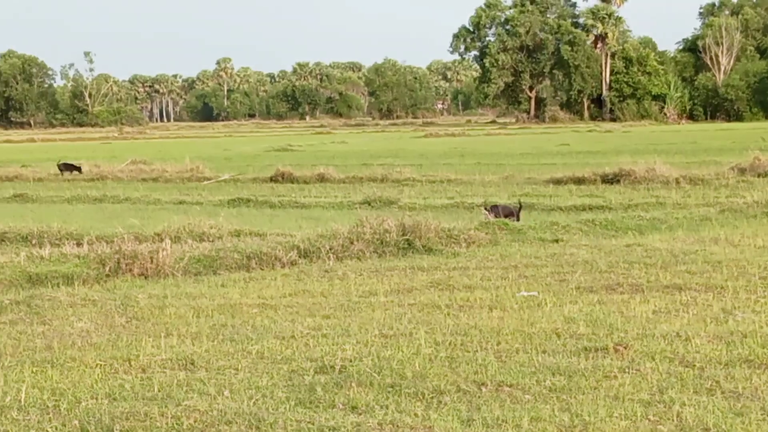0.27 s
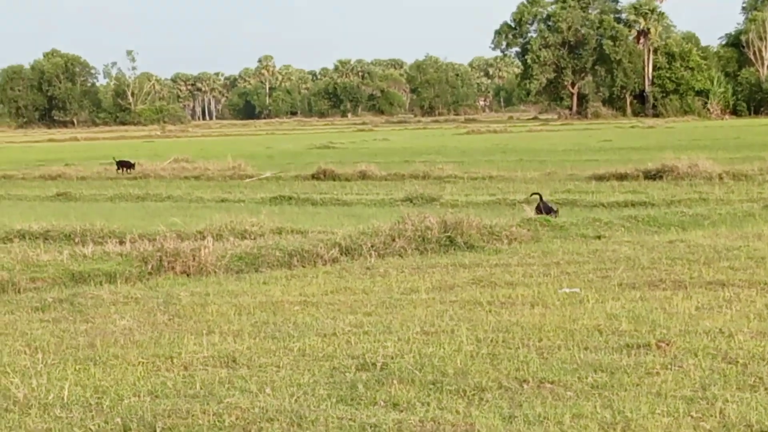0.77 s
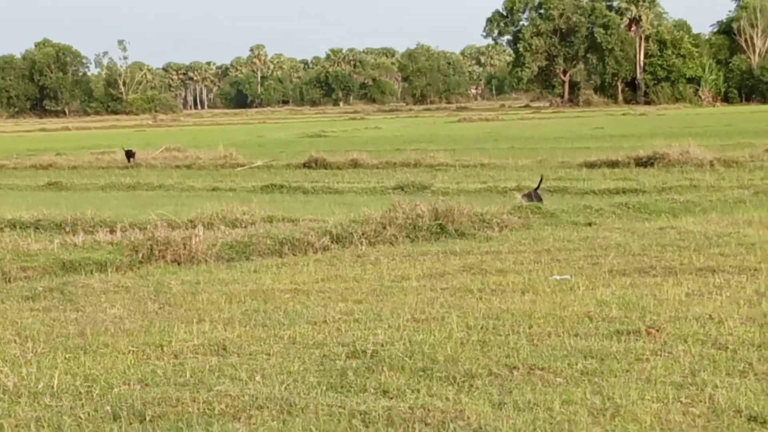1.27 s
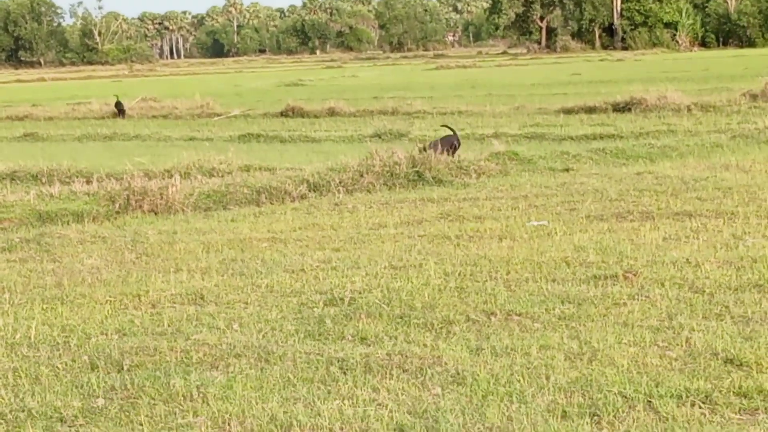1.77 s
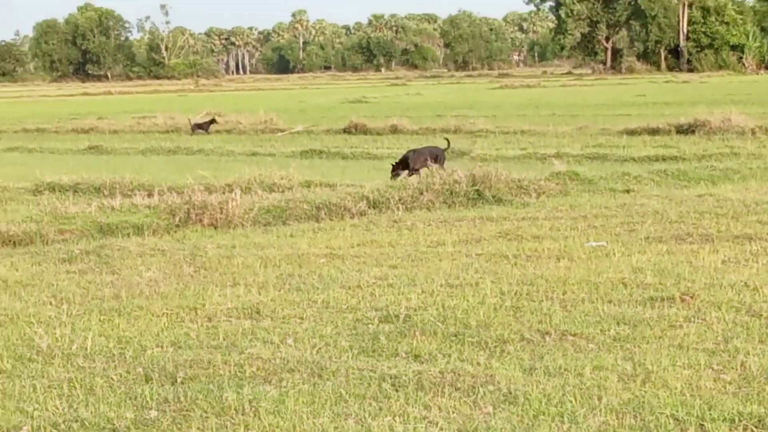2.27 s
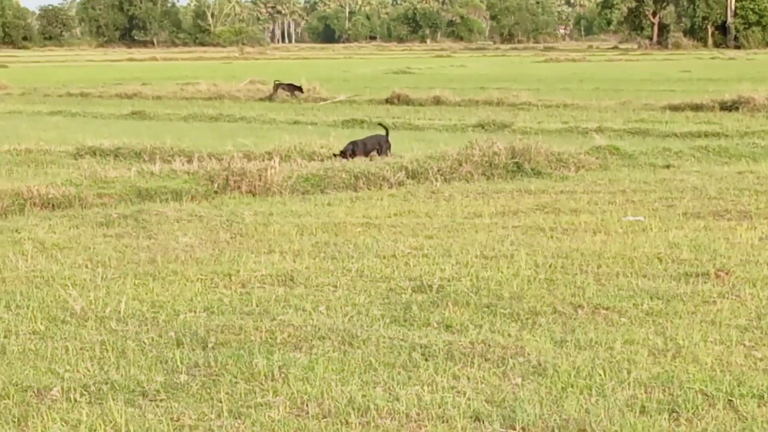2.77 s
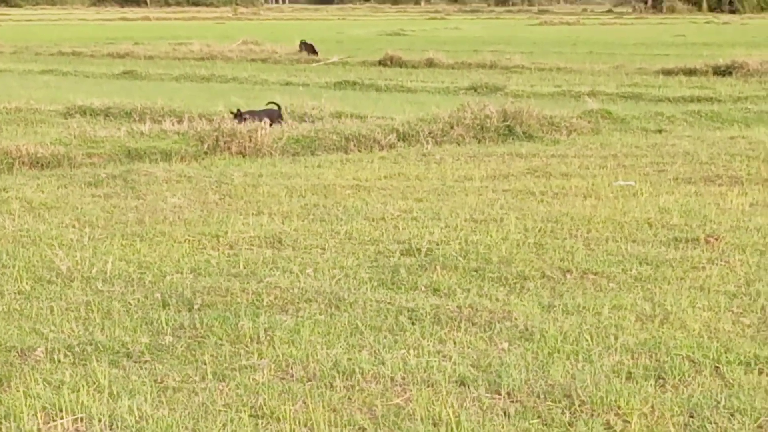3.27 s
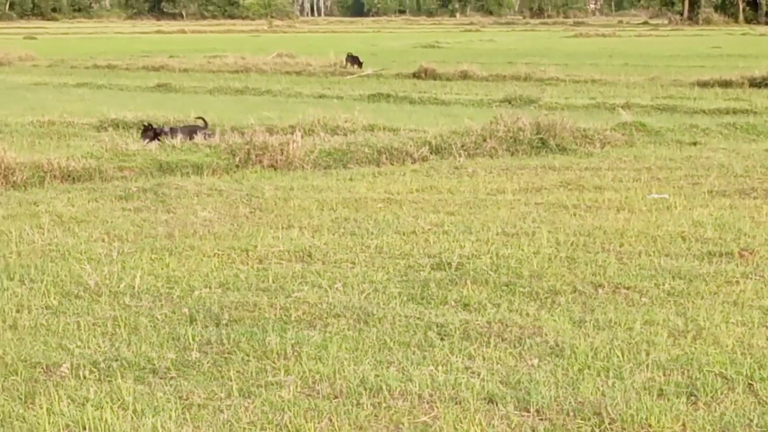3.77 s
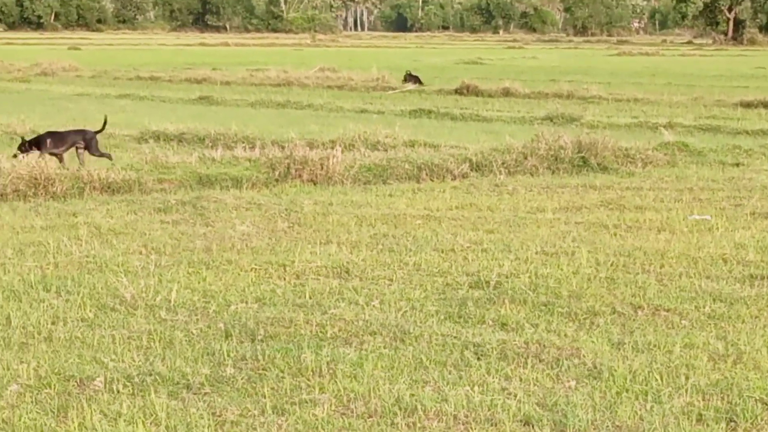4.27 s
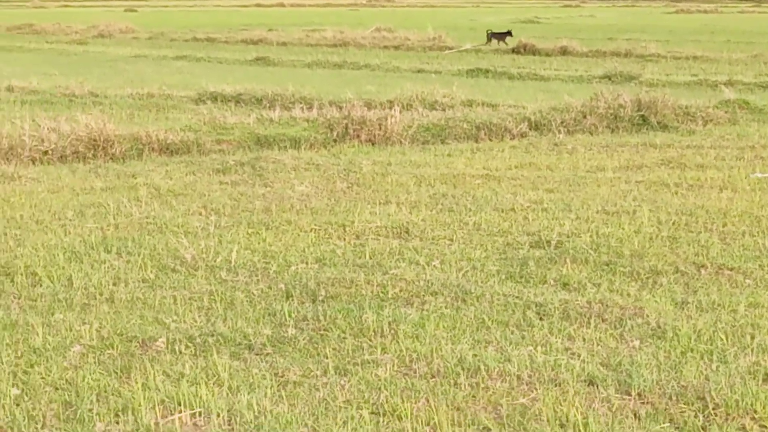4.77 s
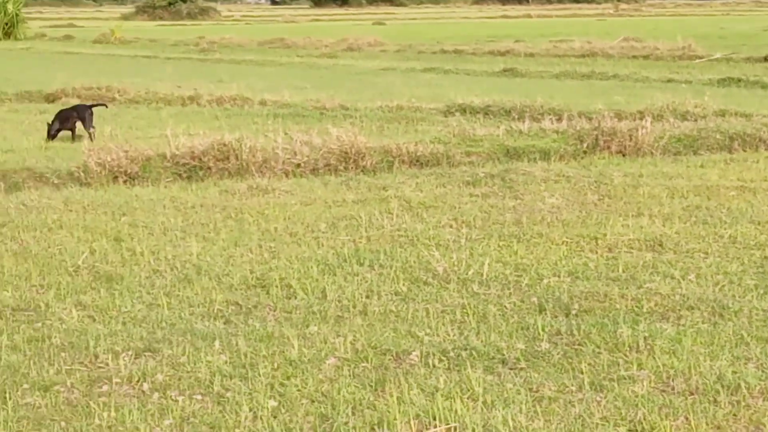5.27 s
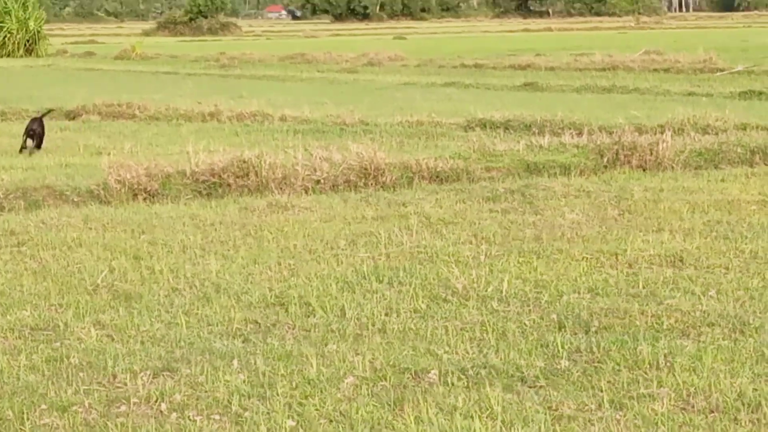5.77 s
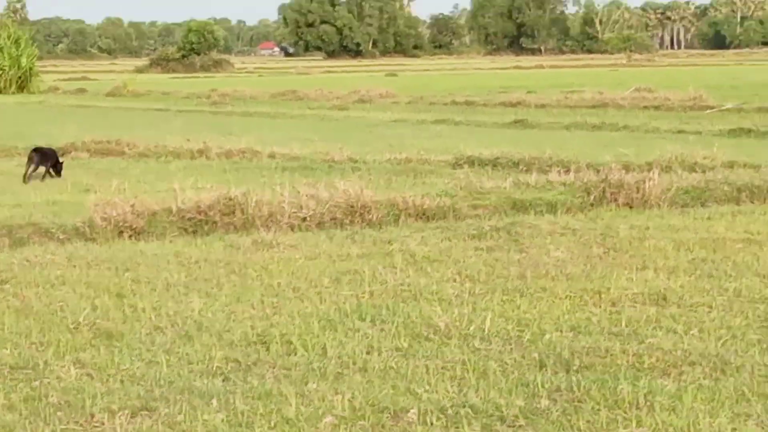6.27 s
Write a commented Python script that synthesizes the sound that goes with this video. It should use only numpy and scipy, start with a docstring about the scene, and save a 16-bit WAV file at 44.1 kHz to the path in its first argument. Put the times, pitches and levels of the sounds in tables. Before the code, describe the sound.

An open field with a small unprotected microphone in the wind. Low lumpy thumps and crackling gusts are strongest in the first two seconds, then ease. A close bird gives tiny sharp chips, mostly in pairs, while another trills farther off and faint whistles echo behind. Dry grass rustles and snaps increasingly in the second half, and a small tap and brush touch the microphone near the end.

```python
"""Wind buffets a small microphone in an open field of grass: bursts of low noise, thumps and crackle.
Dry grass around it rustles and snaps, made of hiss, tiny cracks and short noise bursts.
Close by a bird chips, mostly in pairs; farther off another trills and others whistle faintly, made of
gliding, wavering or flipping sines, nearly all with echoes, over a distant chorus of patchy noise.
Near the end a hand taps the case (decaying sines) and brushes it (noise and sliding rings)."""
import sys
import numpy as np
from scipy import signal
from scipy.fft import rfft, irfft, next_fast_len
from scipy.io import wavfile
from scipy.ndimage import uniform_filter1d

SR = 44100
rng = np.random.default_rng(int(sys.argv[2]) if len(sys.argv) > 2 else 0)


def master(y):
    """Save y as 16-bit WAV."""
    cut = np.clip(np.atleast_2d(y).T, -1, 1)
    pcm = np.round(cut * 32767)  # scale
    wavfile.write(sys.argv[1], SR, pcm.astype(np.int16))


N = 287135


def gain_of(db):
    """Decibels to a factor."""
    return 10 ** (np.asarray(db) / 20)


def evened(x):
    """Scales to unit rms."""
    return x / np.sqrt(np.mean(x ** 2) + 1e-20)


def curves(rows, t):
    """The columns of a table, interpolated at the points t of its first column."""
    s, *columns = np.transpose(rows)
    return [np.interp(t, s, c) for c in columns]


def coloured(x, points):
    """Filters x by a spectrum of (frequency [Hz], gain [dB]) points."""
    f, db = np.transpose(points)
    hz = np.fft.rfftfreq(len(x), 1 / SR)
    gain_db = np.interp(np.log(hz + 1), np.log(f + 1), db, left=-90, right=-90)
    return irfft(rfft(x) * gain_of(gain_db), len(x))


def noise(points):
    """Steady noise of a given spectrum, at unit rms."""
    return evened(coloured(rng.standard_normal(next_fast_len(N)), points)[:N])


def flutter(rate_hz):
    """A random wander of unit rms, up to about rate_hz."""
    b, a = signal.butter(2, rate_hz, fs=SR)
    return evened(signal.lfilter(b, a, rng.standard_normal(N)))


def swells(times, lengths, levels_db, bend, steady_db):
    """Level in dB of a steady bed plus swells that rise to a peak and fall away alike."""
    t = np.arange(0, N, 32) / SR
    away = np.abs(t - times[:, None]) / lengths[:, None]
    power = gain_of(levels_db[:, None] - 10 * away ** bend) ** 2
    swell_power = np.interp(np.arange(N) / SR, t, power.sum(axis=0))
    return 10 * np.log10(swell_power + gain_of(steady_db) ** 2)


def add(mix, s, sound):
    """Mixes a sound in at s seconds."""
    part = mix[max(round(s * SR), 0):][:len(sound)]
    part += sound[:len(part)]


def whistle(hz, db, overtone_db=-61.5):
    """A sine that follows pitch and level curves, with a weak second harmonic."""
    turn = 2 * np.pi * (np.cumsum(hz) / SR + rng.random())
    return gain_of(db) * (np.sin(turn) + gain_of(overtone_db) * np.sin(2 * turn))


def echoes(x, t60, level_db):
    """Scattered reflections from bushes and trees: sparse taps that die away, duller than the direct sound."""
    t = np.arange(SR // 2) / SR
    taps = rng.standard_normal(len(t)) * (rng.random(len(t)) < .1)
    taps = taps * gain_of(-60 * t / t60) * (t > .002)
    tail = signal.oaconvolve(x, taps / np.linalg.norm(taps))[:N]
    dull = signal.butter(4, 7800., fs=SR, output="sos")
    return x + gain_of(level_db) * signal.sosfilt(dull, tail)


def wind():
    """Lumpy turbulence: smaller eddies come in sharper bursts; single eddies thump the membrane."""
    # spectra from large to finest eddies, of a thump's crackle and of the steady rumble:
    # (frequency [Hz], relative level [dB])
    large_eddies = [(30, -31.5), (55, -12), (80, 2), (120, 2.5), (165, -1), (210, -6), (300, -37),
                    (450, -50)]
    small_eddies = [(130, -23), (200, -3), (250, 4), (330, -1), (450, -12), (650, -27.5), (1000, -53)]
    finest_eddies = [(300, -14), (450, 0.5), (600, -6.5), (900, -20.5), (1400, -38.5), (2200, -59)]
    flap = [(300, -8), (450, 0), (600, -4), (900, -15), (1400, -33), (2200, -56)]
    rumble = [(15, -12.5), (30, -13.5), (45, -6), (60, 4), (90, -7.5)]
    # puffs on the microphone:
    # (time of the peak [s], level [dB], time to fall 10 dB [s], small eddies over the puff [dB])
    puffs = [(0.045, -26.5, 0.037, -5.0), (0.125, -20.0, 0.047, -4.0), (0.253, -20.7, 0.049, -0.8),
             (0.378, -23.7, 0.062, -5.4), (0.497, -24.8, 0.023, 0.5), (0.563, -34.3, 0.033, 1.2),
             (0.689, -31.3, 0.115, -12.2), (0.935, -27.0, 0.058, -7.7), (1.184, -41.5, 0.249, -8.3),
             (1.396, -27.4, 0.056, -5.6), (1.549, -26.0, 0.023, -3.6), (1.615, -18.1, 0.029, -7.1),
             (1.735, -22.3, 0.015, -4.9), (1.824, -28.4, 0.043, -8.0), (1.97, -36.6, 0.03, -8.3),
             (2.053, -29.2, 0.053, -6.9), (2.207, -36.4, 0.012, -8.3), (2.308, -29.8, 0.022, -8.1),
             (2.436, -29.5, 0.037, -7.7), (2.582, -24.8, 0.045, -9.3), (2.719, -42.9, 0.017, -2.7),
             (2.856, -31.8, 0.066, -10.1), (2.966, -24.5, 0.02, -4.6), (3.069, -20.5, 0.043, -5.5),
             (3.154, -24.1, 0.015, -10.5), (3.273, -38.8, 0.024, -12.5), (3.358, -41.2, 0.051, -9.0),
             (3.463, -38.9, 0.044, -19.4), (3.536, -43.7, 0.025, -2.3), (3.694, -28.4, 0.063, -8.3),
             (3.889, -33.4, 0.046, -7.2), (4.007, -27.4, 0.061, -9.1), (4.092, -31.5, 0.019, -4.6),
             (4.16, -30.5, 0.072, -8.0), (4.335, -31.1, 0.071, -3.3), (4.459, -34.4, 0.045, -10.0),
             (4.567, -26.0, 0.04, -2.7), (4.733, -37.8, 0.098, -6.9), (4.929, -33.3, 0.11, -12.3),
             (5.084, -34.7, 0.059, -3.4), (5.204, -49.0, 0.042, -3.4), (5.373, -50.4, 0.154, -7.5),
             (5.442, -41.0, 0.023, -7.4), (5.563, -36.5, 0.057, -14.8), (5.66, -29.8, 0.022, -5.7),
             (5.808, -32.7, 0.045, -9.2), (5.879, -39.3, 0.012, -7.7), (5.931, -38.5, 0.024, -7.5),
             (6.16, -38.9, 0.123, -6.1), (6.275, -30.8, 0.015, -14.6), (6.451, -31.9, 0.056, -14.9)]
    # single eddies: (time [s], peak of the envelope [dB], pitch [Hz], peak of the crackle [dB])
    thumps = [(.052, -20, 198, -30), (.077, -15, 139, -26), (.096, -17, 200, -25), (.113, -20, 220, -23),
              (.128, -6.5, 160, -18), (.16, -13, 170, -21), (.203, -17, 250, -20), (.222, -15, 154, -27),
              (.25, -11, 140, -30), (.262, -18, 230, -20), (.3, -18, 240, -23), (.362, -12, 166, -23),
              (.494, -11, 197, -24), (.551, -24, 200, -45), (.633, -25.5, 127, -50),
              (.903, -26.5, 145, -38), (.918, -26, 200, -35), (1.352, -23, 164, -46),
              (1.394, -15, 184, -38), (1.541, -16.5, 128, -44), (1.546, -17, 146, -45),
              (1.595, -5.5, 150, -20), (1.721, -15, 101, -38), (1.784, -25, 100, -55),
              (1.825, -19, 152, -50), (1.957, -26, 183, -57), (2.018, -22, 178, -40),
              (2.087, -22.5, 169, -55), (2.199, -27, 129, -55), (2.286, -24.5, 130, -52),
              (2.414, -28.5, 201, -55), (2.562, -15.5, 154, -38), (2.713, -32, 113, -57),
              (2.821, -23, 137, -55), (2.957, -21, 226, -38), (3.029, -20, 147, -42),
              (3.054, -16, 170, -33), (3.075, -17, 150, -38), (3.131, -22, 194, -37),
              (3.155, -23, 150, -38), (3.264, -31, 100, -67), (3.328, -34, 106, -68),
              (3.451, -33, 113, -62), (3.522, -30, 105, -60), (3.64, -25, 110, -46),
              (3.702, -19.5, 137, -52), (3.738, -23.5, 147, -48), (3.874, -25.5, 132, -42),
              (3.969, -27, 123, -45), (4.087, -23.5, 181, -40), (4.164, -25, 113, -45),
              (4.226, -31, 132, -50), (4.286, -27, 158, -42), (4.433, -31, 153, -45),
              (4.542, -19, 113, -28), (4.59, -24, 170, -36), (4.708, -28, 104, -53),
              (4.914, -25.5, 112, -50), (5.092, -24, 170, -45), (5.428, -33, 167, -62),
              (5.544, -30, 100, -64), (5.655, -21.5, 187, -49), (5.799, -25, 153, -58),
              (5.921, -30, 140, -48), (6.153, -26, 190, -44), (6.272, -23, 136, -60),
              (6.412, -29, 140, -60), (6.457, -24, 111, -56)]
    lull_db, lull_edge_db = -50.5, -14  # between puffs; the second is relative to the first
    puff_bend = 1.5  # 1 is a pointed puff, 2 a round one
    thump_cycles = 1.55  # cycles from the onset to the peak
    crest_db = 8.5  # peak over rms of a crackle

    s, db, length, over_db = np.transpose(puffs)
    gust_db = swells(s, length, db, puff_bend, lull_db)
    edge_db = swells(s, length, db + over_db, puff_bend, lull_db + lull_edge_db)
    crackle_db = -44.5 + 1.5 * (edge_db + 28.5)  # the finest eddies grow faster with the gust
    lumps, bursts = flutter(rate_hz=20.9), flutter(rate_hz=58)
    body = evened(noise(large_eddies) * gain_of(1.9 * lumps))
    edge = evened(noise(small_eddies) * gain_of(4. * lumps + 2.6 * bursts))
    crackle = evened(noise(finest_eddies) * gain_of(2.2 * lumps + 5.2 * bursts))
    out = gain_of(gust_db) * body + gain_of(edge_db) * edge + gain_of(crackle_db) * crackle

    roughened = np.zeros(N)
    for (s, db, hz, rough_db), phase in zip(thumps, rng.random(len(thumps))):
        u = np.arange(0, 6, hz / SR / thump_cycles * 2)  # time in units of half the rise
        swell = (u / 2 * np.exp(1 - u / 2)) ** 2
        tone = np.sin(np.pi * (thump_cycles * u + 2 * phase))
        add(out, s - .003, gain_of(db) * swell ** 2.17 * tone)
        add(roughened, s - .002, gain_of(rough_db - crest_db) * swell ** 3.5)
    out += roughened * noise(flap)
    low_cut = signal.butter(4, 52., "highpass", fs=SR, output="sos")  # the vent of the capsule
    return signal.sosfilt(low_cut, out) + gain_of(-51.5) * noise(rumble)


def field():
    """Distant chorus of insects, birds and leaves: noise with drifting patches in time and pitch."""
    # spectrum of the far field: (frequency [Hz], relative level [dB])
    chorus = [(290, -19), (500, -9), (773, -6.5), (1280, -10.5), (3110, -11.5), (4530, -8), (7100, -25),
              (8090, -25.5), (9360, -17), (10400, -39.5), (12000, -28), (14900, -33.5), (16000, -37.5)]
    hz, t, z = signal.stft(noise(chorus), SR, nperseg=512)
    patches = uniform_filter1d(rng.standard_normal(z.shape), size=5, axis=0)  # across pitch
    patches = uniform_filter1d(patches, size=8, axis=1)  # across time
    patchy = signal.istft(z * gain_of(3.3 * evened(patches)), SR, nperseg=512)[1][:N]
    return gain_of(-66.5) * evened(patchy)


def grass():
    """Dry stalks in the breeze: fine rustle of hiss and tiny cracks, broad swishes, and single snaps."""
    # the steady bed: (time [s], fine rustle level [dB], broad swish level [dB])
    bed = [(0., -82, -80), (.5, -87, -86), (1.25, -81, -79), (1.7, -90, -76), (2.25, -76, -74),
           (3., -75, -73), (3.6, -69, -67), (4., -78, -74), (4.42, -82, -75), (4.5, -71, -73),
           (4.95, -73, -72), (5.35, -73, -70), (5.8, -69, -70), (5.84, -83, -78), (6.51, -76, -72)]
    # rustles that stand out:
    # (time of the peak [s], time to fall 10 dB [s], fine level [dB], swish level [dB])
    rustles = [(.14, .07, -77, -83), (1.27, .04, -73, -66), (2.36, .05, -68, -75), (2.52, .09, -66, -66),
               (2.8, .05, -61, -67), (2.89, .12, -68, -68), (3.21, .021, -67, -71), (3.425, .085, -61, -53),
               (4.08, .04, -66, -70), (4.15, .021, -72, -63), (4.68, .1, -68, -75), (5.07, .13, -65, -72),
               (5.5, .11, -67, -64), (5.67, .03, -65, -64), (6.07, .06, -58, -49), (6.215, .021, -65, -57),
               (6.26, .04, -63, -58), (6.463, .014, -52, -63)]
    # spectra of the rustle and the swish: (frequency [Hz], relative level [dB])
    fine_spectrum = [(7000, -22.5), (8300, -25.5), (8900, -0.5), (9500, 3.5), (10500, -3), (11400, -7),
                     (12200, -24), (14000, -22), (16000, -23)]
    swish_spectrum = [(530, -38), (900, -7), (1250, -6.5), (1720, -4.5), (2600, -5.5), (4250, 0.5),
                      (5280, -4.5), (6890, -19), (9770, -4.5), (11800, -13.5), (15100, -13), (16000, -20)]
    # stalks that snap: (time [s], level [dB], gain at 2.5 to 5 kHz [dB])
    snaps = [(1.8384, -52, -10), (2.795, -45, -9), (3.325, -58.5, 0), (3.3543, -50, -10), (3.3822, -50, -6),
             (3.6435, -43, -11), (3.7577, -46.5, -12), (4.0038, -50, -14), (4.0726, -47, -21),
             (4.153, -34, -18), (4.4199, -53, -12), (4.5092, -51, -13), (4.5765, -46, -16),
             (4.6149, -44, -15), (4.643, -43, -18), (4.7245, -46, -17), (4.9955, -50, -15),
             (5.0514, -47, -15), (5.3882, -43, -11), (5.5413, -42, -8), (5.6052, -47.5, -8),
             (5.662, -44, -16), (5.6845, -41, -17), (5.7575, -44, -20), (5.7907, -48, -7),
             (5.814, -47, -11), (5.911, -59, -4), (6.0057, -49, -11), (6.0332, -36.5, -18), (6.062, -43, 4),
             (6.075, -48, 6), (6.088, -50, 5), (6.251, -45, -12), (6.2981, -41, -14), (6.328, -52, -14),
             (6.388, -52, -16), (6.4088, -50, -14)]

    s, length, fine_peaks_db, swish_peaks_db = np.transpose(rustles)
    fine_bed_db, swish_bed_db = curves(bed, np.arange(N) / SR)
    fine_db = swells(s, length, fine_peaks_db, 1.3, fine_bed_db)
    swish_db = swells(s, length, swish_peaks_db, 1.3, swish_bed_db)

    # about 300 tiny cracks a second, of random size
    sizes = gain_of(3.5 * np.minimum(rng.exponential(1, N), 4)) * (rng.random(N) < 300 / SR)
    cracks = evened(signal.oaconvolve(sizes, np.exp(-np.arange(200) / 27.0))[:N])
    fine = evened(noise(fine_spectrum) * (1 + .7 * cracks) * gain_of(1.5 * flutter(rate_hz=31)))
    swish = evened(noise(swish_spectrum) * (1 + .35 * cracks) * gain_of(2.5 * flutter(rate_hz=54)))
    out = gain_of(fine_db) * fine + gain_of(swish_db) * swish

    t = np.arange(512) / SR
    dying = gain_of(-60 * t / .007)  # falls 60 dB in 7 ms
    lead = 128  # silent samples ahead of the burst, room for the filter to spread
    for s, db, low_db in snaps:
        colour = [(1500, -31), (2500, low_db), (5000, low_db), (7500, low_db + 1.0),
                  (9300, 7), (12000, -6), (16000, -21)]
        burst = rng.standard_normal(len(t)) * dying
        snap = coloured(np.pad(burst, (lead, 0)), colour)
        add(out, s - lead / SR, gain_of(db) * snap)
    return out


def near_bird():
    """Chips and twitters close by: one gliding sine for each kind of call, scaled in pitch and level."""
    # one chip, then one falling twitter of three quick arches: (time [s], pitch [Hz], level [dB])
    chip = [(0., 3800, -16.5), (.0008, 5000, 0.5), (.0012, 6200, -14), (.0017, 7300, -6), (.003, 6800, -6),
            (.005, 7050, -6), (.0075, 7400, -1.5), (.0095, 8300, -14), (.011, 8800, -42)]
    twitter = [(0., 4300, -27), (.001, 5300, -8), (.002, 7100, 2), (.004, 6800, -5), (.0055, 5000, -26),
               (.007, 4400, -2), (.0085, 6600, -5), (.0105, 5900, -19.5), (.012, 4300, -6),
               (.0135, 5100, 8.5), (.0155, 4100, -19.5), (.02, 3500, -23)]
    # when they sound: (time [s], level added to the shape [dB], pitch factor)
    chips = [(.0197, -57, 1.), (.1574, -51.5, 1.), (.5433, -41, 1.), (0.6838, -44.5, 0.99),
             (1.2454, -39, 1), (1.3749, -40, 0.96), (1.9084, -51, 1.), (2.0388, -47.5, 0.97),
             (2.5864, -49.5, 1.), (2.72, -55, 0.97), (3.2227, -49, 0.98), (3.3554, -48.5, 0.94),
             (3.8682, -35.5, 1), (4.004, -39, 0.96), (4.5396, -43, 0.96), (4.6752, -38.5, 0.97),
             (5.2723, -56, 0.9), (5.4138, -42.5, 0.95), (5.8632, -50.5, 0.99), (5.9961, -56, 1),
             (6.113, -50, 0.88)]
    twitters = [(0.3427, -44, 0.98), (.5455, -49, 0.95), (4.4253, -60, 1.03), (5.138, -70, 1.1),
                (5.35, -57, 1.02), (5.88, -60.5, 1.23)]
    out = np.zeros(N)
    for shape, calls in ((chip, chips), (twitter, twitters)):
        hz, shape_db = curves(shape, np.arange(0, shape[-1][0], 1 / SR))
        for s, db, factor in calls:
            add(out, s, whistle(hz * factor, shape_db + db))
    return echoes(out, t60=0.074, level_db=-17)


def chatter(out):
    """Short gliding sines at random moments: other calls from all over the field, mixed into out."""
    per_s = 14.
    for when, pitch, glide, length, size in rng.random((200, 5)):
        u = np.linspace(0, 1, round((0.012 + 0.044 * length) * SR))
        hz = 2300 * 2.3 ** pitch * (1 + .25 * pitch * (glide - .7) * u)
        call = whistle(hz, -82 + 9. * size) * np.sin(np.pi * u)
        add(out, when * 200 / per_s, call)  # those past the end are dropped


def warble():
    """One far call whose pitch flips between a short low and a long high note, fading at each flip."""
    # (centre [Hz], swing [Hz], level [dB])
    hz, swing_hz, db = (2680, 340, -58)
    length_s, flips_per_s = .07, 47.  # cycles of low and high a second
    t = np.arange(0, length_s, 1 / SR)
    flips = np.tanh(4 * np.cos(2 * np.pi * flips_per_s * (t - .004)) - 1.1)
    return whistle(hz - swing_hz * flips, db) * flips ** 2 * signal.windows.tukey(len(t), .15)


def far_birds():
    """Faint wavering whistles, buzzy slurs and chatter, all blurred by echoes, and one dry warble."""
    # whistles: (time [s], length [s], pitch [Hz], level [dB])
    whistles = [(.5, .04, 2800, -72), (.59, .05, 2620, -70), (.69, .08, 2230, -67), (.78, .09, 2880, -63),
                (.97, .04, 2650, -70), (1.29, .05, 2760, -64), (1.545, .03, 2970, -58),
                (1.69, .07, 2920, -65), (1.86, .04, 2700, -66), (2.03, .09, 2940, -62),
                (2.53, .05, 2600, -66), (2.65, .09, 2925, -67), (3.14, .09, 2520, -65),
                (3.335, .03, 2770, -59), (3.39, .02, 2850, -60), (3.655, .02, 2850, -63),
                (3.71, .04, 2950, -63), (4.32, .03, 2620, -67), (4.43, .06, 2900, -63),
                (4.88, .04, 2870, -68), (5.17, .08, 2680, -63), (5.26, .05, 2550, -69),
                (5.35, .04, 2600, -66), (5.4, .05, 2450, -68), (5.445, .15, 2900, -59.5),
                (5.52, .05, 2350, -67), (5.6, .03, 2750, -66), (5.625, .04, 2350, -66),
                (5.88, .05, 3090, -67), (6.1, .08, 2740, -64)]
    # slurred calls: (time [s], length [s], first pitch [Hz], last pitch [Hz], level [dB])
    slurs = [(.155, .065, 3750, 3750, -67), (.7, .08, 3750, 3700, -64), (1.557, .03, 4050, 3900, -59),
             (1.568, .05, 4750, 3000, -56), (1.705, .04, 4100, 4000, -64), (1.86, .04, 3950, 3680, -63),
             (2.16, .07, 4700, 3700, -59), (2.78, .05, 4680, 3600, -60), (3.255, .06, 4650, 3600, -54),
             (3.67, .035, 4250, 3830, -61), (3.895, .05, 4600, 3300, -57), (5.215, .022, 3800, 5000, -59),
             (5.237, .02, 4600, 3600, -56), (5.303, .032, 5100, 3500, -56), (5.73, .018, 4300, 5100, -60),
             (5.765, .04, 5200, 3300, -54), (6.17, .09, 3520, 3530, -63)]
    fade_share, sag_db, waver = .35, -3, .009  # tapered share, level change over a note, pitch wander (share)
    out = np.zeros(N)
    wander = flutter(rate_hz=25)
    level_notes = [(s, length, hz, hz, db) for s, length, hz, db in whistles]
    for notes, throb, throb_hz in ((level_notes, .3, 70), (slurs, .5, 170)):
        for s, length, first_hz, last_hz, db in notes:
            t = np.arange(0, length, 1 / SR)
            hz = first_hz + (last_hz - first_hz) * t / length
            hz = hz * (1 + waver * wander[round(s * SR):][:len(t)])
            pulsing = 1 + throb * np.cos(2 * np.pi * throb_hz * t)
            fade = signal.windows.tukey(len(t), fade_share)
            add(out, s, whistle(hz, db + sag_db * t / length) * pulsing * fade)
    chatter(out)
    wavering = 1 + .4 * flutter(rate_hz=120)
    out = echoes(out * wavering, t60=0.2, level_db=-5.0)
    add(out, 1.478, warble())
    return out


def trilling_bird():
    """Notes that sweep up and fall back; the ground and a near bush double them, far trees blur them."""
    # one note: (share of the note, pitch of a 23 ms note as a share of the top, level [dB])
    arch = [(0., .56, -19), (.18, .61, -11.5), (.38, .74, 4), (.52, 0.83, -5), (.6, .99, -10.5),
            (.72, 1.01, -18), (.8, .88, -1), (.9, 0.71, -6), (1., 0.64, -14)]
    # trills: (first note [s], last note [s], level [dB], top pitch [Hz],
    #          first grace note over the level [dB], last note over the level [dB])
    trills = [(.976, 1.217, -42, 6270, -6.5, -2.5), (2.292, 2.477, -34.5, 6150, 0, -8),
              (3.024, 3.2086, -42, 6200, .2, -1), (5.3335, 5.517, -46.5, 5960, -6, -3)]
    # the notes slow down towards the end: (time before the last note [s])
    before_last_s = [.241, .186, .129, .066, 0.]
    # grace notes follow the first two notes: (delay after the first [s], after the second [s])
    grace_after_s = (.029, .034)
    note_s, opening_db = .021, -7.5
    grace_s, grace_hz, second_grace_db = .013, 5450, -11
    lead_s, lead_db = .014, -17  # a faint grace note leads in

    notes, out = [], np.zeros(N)
    for first, last, db, top_hz, grace_db, last_db in trills:
        times = [last - s for s in before_last_s if last - s > first - note_s]
        levels = [opening_db] + [0] * (len(times) - 2) + [last_db]
        notes += [(s, db + over_db, note_s, top_hz) for s, over_db in zip(times, levels)]
        notes += [(s + after, db + over_db, grace_s, grace_hz)
                  for s, after, over_db in zip(times, grace_after_s, (grace_db, second_grace_db))]
        notes.append((first - lead_s, db + lead_db, grace_s, grace_hz))
    for s, db, length, top_hz in notes:
        share, shape_db = curves(arch, np.arange(0, 1, 1 / (length * SR)))
        share = 1 - (1 - share) * length / 0.023  # short notes span less
        # the overtone weakens as the pitch climbs past 4.7 kHz
        overtone_db = -20. - 20. * np.maximum(share * top_hz - 4700, 0) / 500
        note = whistle(share * top_hz, shape_db + db, overtone_db)
        for delay, echo_db in ((0, 0.5), (.0023, -2.5), (.0062, -7.5)):
            add(out, s - .3 * length + delay, gain_of(echo_db) * note)
    husky = 1 + .45 * flutter(rate_hz=300)
    return echoes(out * husky, t60=0.25, level_db=-5.5)


def tap():
    """A fingertip on the case: its modes ring as sines that die within milliseconds."""
    # (frequency [Hz], level [dB], time to fall 60 dB [s])
    modes = [(990, 12.5, 0.004), (1760, 2, 0.007), (3000, -20, 0.0089), (4500, -11, 0.0092)]
    t = np.arange(1500) / SR
    ringing = sum(gain_of(db - 60 * t / t60) * np.sin(2 * np.pi * hz * t) for hz, db, t60 in modes)
    return np.minimum(t / 0.00038, 1) * ringing


def brush(t, track):
    """Something brushes past the microphone: the scrape slides down and wakes one ring after another."""
    # spectrum of the scrape: (frequency [Hz], relative level [dB])
    scrape = [(1300, -28), (2000, -8), (3200, -5.5), (5500, -9.5), (7500, -29), (9300, -6), (10500, -22),
              (11700, -2), (13500, -24), (16000, -22)]
    # hollows of the case: (frequency midway through the brush [Hz], level [dB])
    hollows = [(1700, 4), (2350, 2.5), (2820, 0), (3200, 4.5)]
    reach_db_per_octave = -20
    db, centre_hz = curves(track, t)
    sinking = np.linspace(1 + .05 / 2, 1 - .05 / 2, len(t))  # the rings sink by 5 % in all
    sound = noise(scrape)[:len(t)]
    for hz, ring_db in hollows:
        woken_db = ring_db + reach_db_per_octave * abs(np.log2(hz / centre_hz))
        sound = sound + whistle(hz * sinking, woken_db) * (1 + .7 * flutter(rate_hz=140)[:len(t)])
    return gain_of(db) * sound * signal.windows.tukey(len(t), .2)


def hand():
    """A hand on the case beside the microphone: a tap, then a brush."""
    # the tap: (time [s], level [dB])
    tap_s, tap_db = (6.1967, -30)
    # the brush: (time [s], level [dB], centre of the scrape [Hz])
    track = [(6.437, -72, 2950), (6.452, -53, 2850), (6.465, -48, 2400), (6.476, -48, 1800),
             (6.492, -64, 1600)]
    out = np.zeros(N)
    add(out, tap_s, gain_of(tap_db) * tap())
    t = np.arange(track[0][0], track[-1][0], 1 / SR)
    add(out, t[0], brush(t, track))
    return out


def scene():
    """All sources at one microphone."""
    air = wind() + field() + grass()
    birds = near_bird() + far_birds() + trilling_bird()
    return (air + birds + hand())[None]


def record(dry):
    """The band limit of the recorder, a steep low-pass at 15.75 kHz."""
    low_pass = signal.firwin(511, 15750, window=("kaiser", 9), fs=SR)
    return signal.oaconvolve(dry, low_pass[None], "same")


dry = scene()
out = record(dry)
master(out)
```